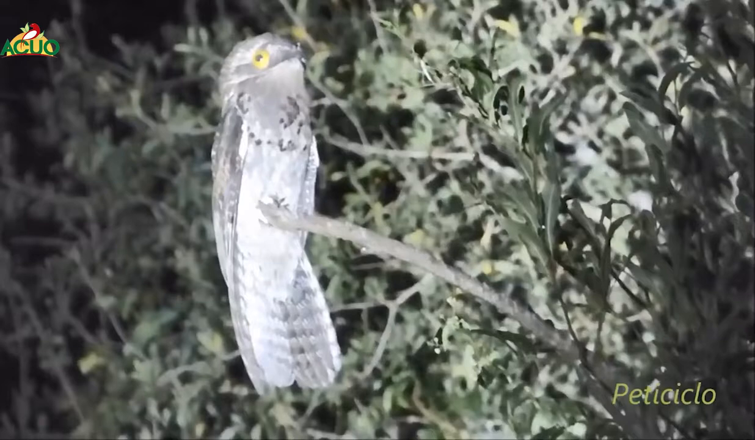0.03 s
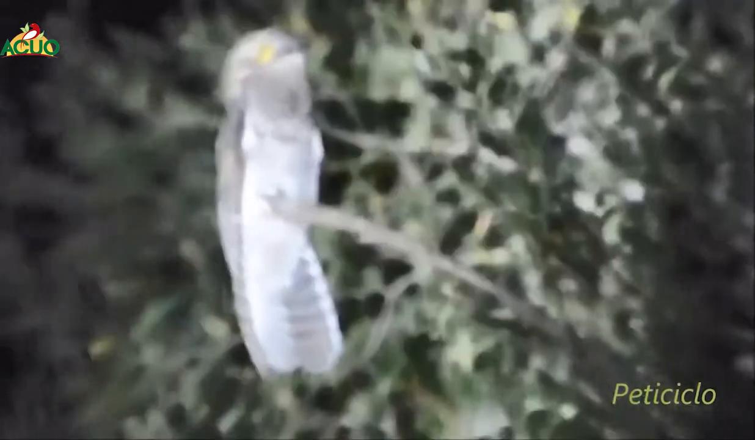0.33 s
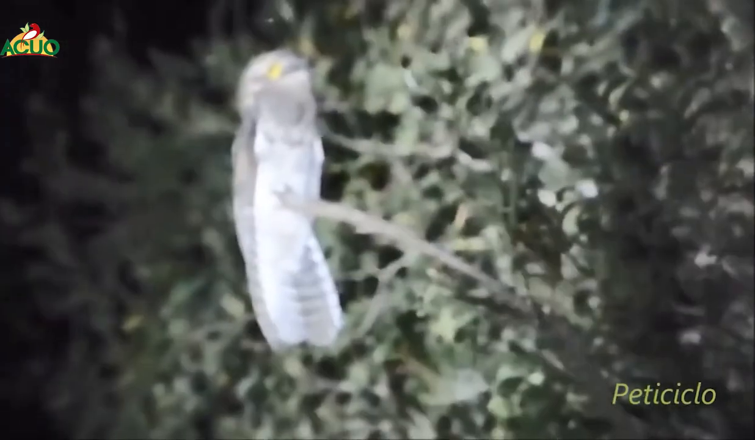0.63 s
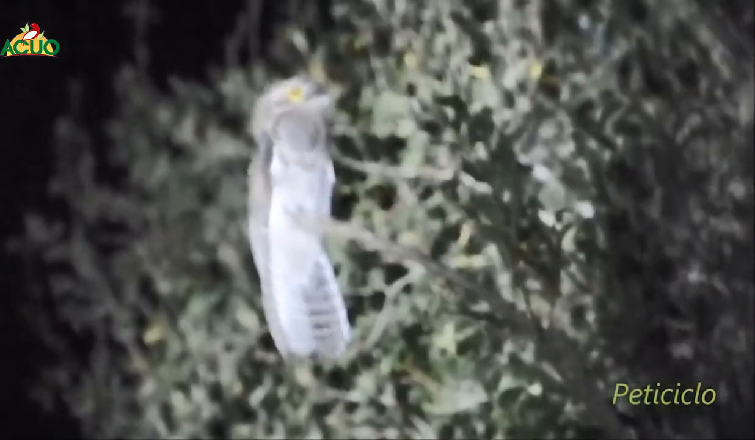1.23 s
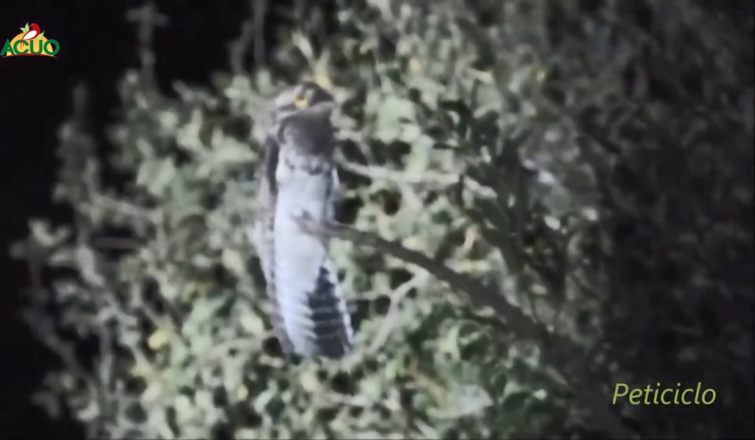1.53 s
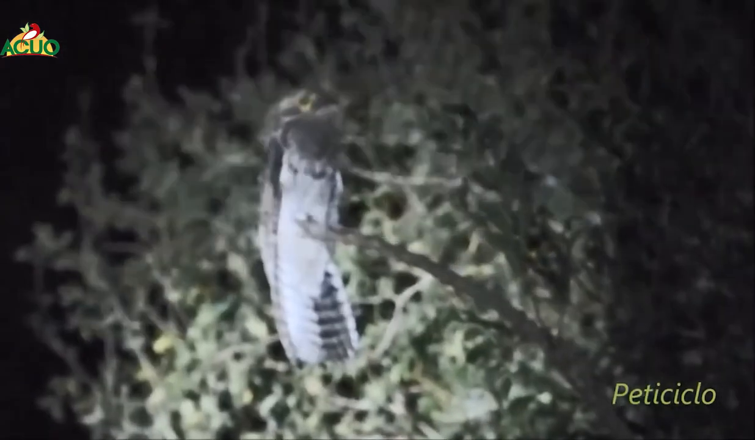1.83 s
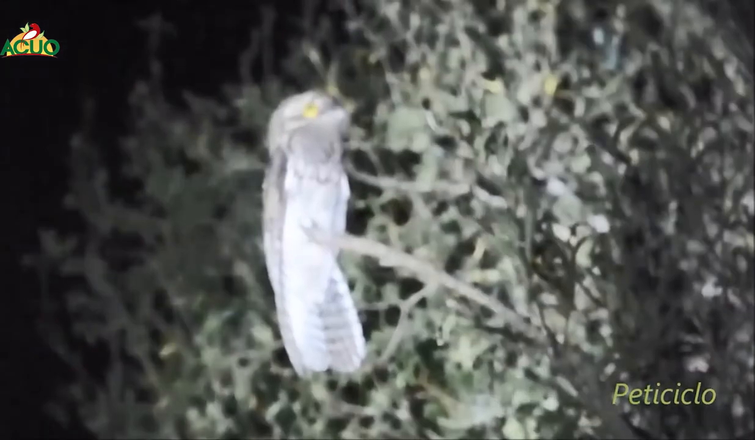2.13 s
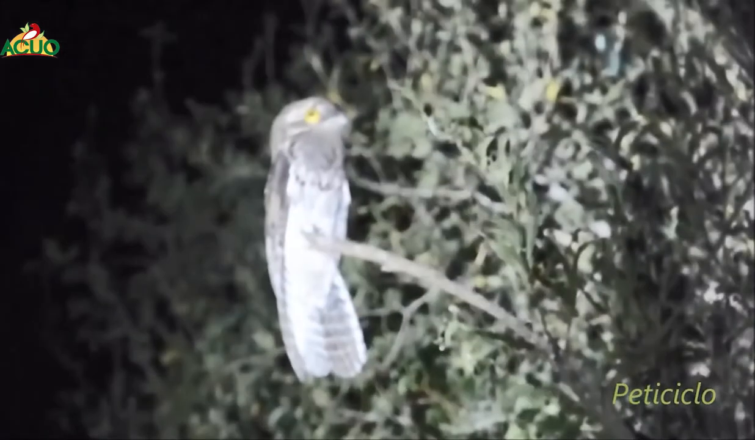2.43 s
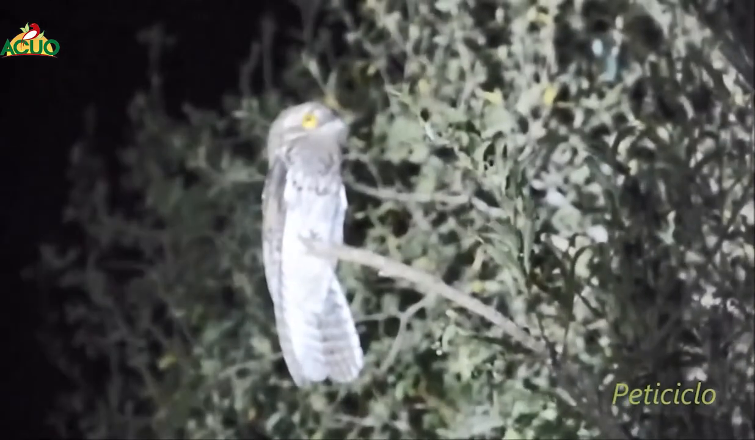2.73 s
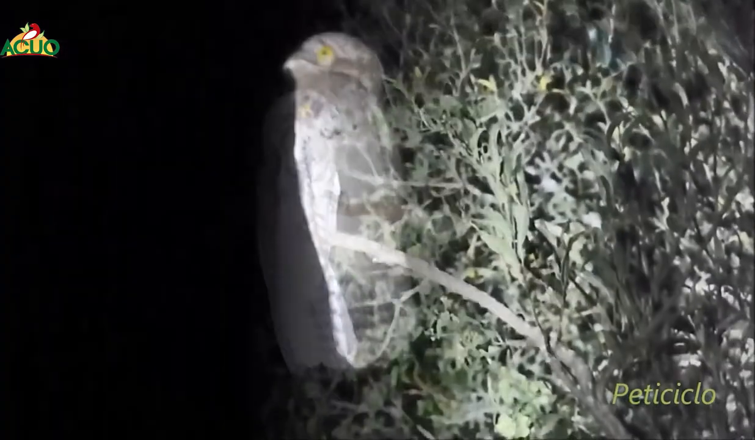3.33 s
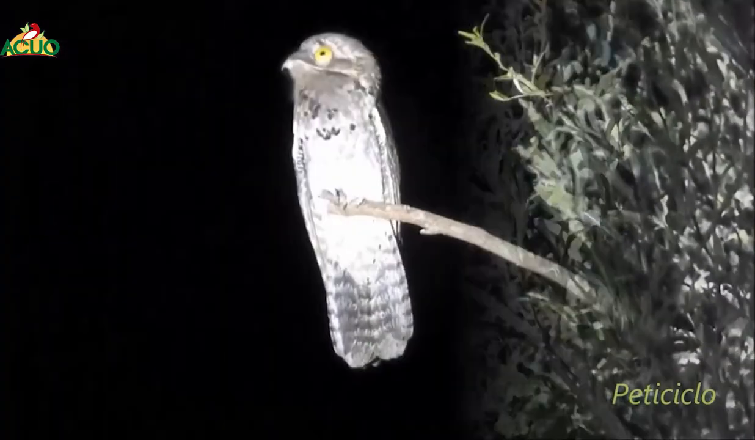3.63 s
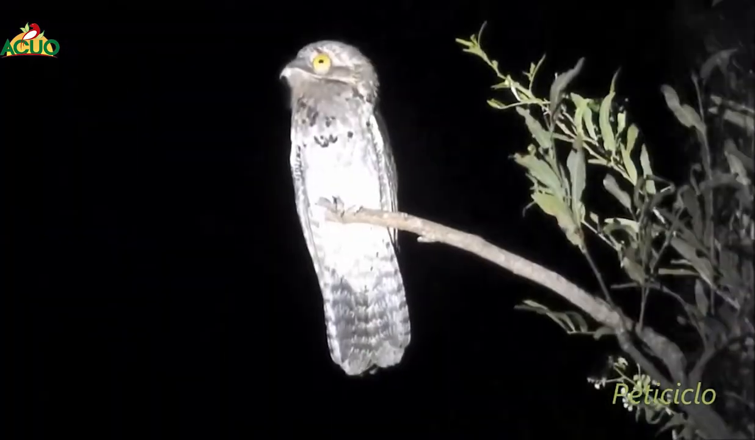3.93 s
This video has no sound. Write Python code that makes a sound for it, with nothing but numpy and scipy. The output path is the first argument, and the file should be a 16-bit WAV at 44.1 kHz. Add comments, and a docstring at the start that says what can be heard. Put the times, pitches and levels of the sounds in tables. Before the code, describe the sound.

A night bird, straight ahead among trees, gives four descending whistled wails with a faint echo. Before it starts, twigs tick over hiss and far crickets; a high katydid rasp joins during the second note.

```python
"""A potoo, a night bird, gives four wailing notes, each lower than the last and led in by a soft gulp.
Its voice is a nearly pure whistle with weak overtones, and the trees return a faint echo.
Crickets trill far off over a steady hiss, a very high insect buzz swells and fades, and a nearer
katydid starts rasping its wings. A few twigs tick early on; faint pips and hoots come from far away."""
import sys
import numpy as np
from scipy import signal
from scipy.fft import rfft, irfft
from scipy.io import wavfile

SR = 44100
rng = np.random.default_rng(int(sys.argv[2]) if len(sys.argv) > 2 else 0)


def unload_wav(signal):
    """Save mono or channel-first audio to the path in sys.argv[1] as 16-bit WAV at rate SR, clipped to [-1, 1]."""
    wavfile.write(
        sys.argv[1],
        SR,
        np.round(np.clip(np.atleast_2d(signal).T, -1, 1) * 32767).astype(np.int16),
    )


N = 176400
TIME = np.arange(N) / SR

# how alike the two ears hear the night: (frequency [Hz], likeness [0 to 1])
EAR_LIKENESS = [(40, 1), (130, 1), (300, 0.98), (650, 0.23), (1400, 0.79), (3000, 0.81), (5000, 0.64),
                (14000, 0.31)]
# steady hiss and rumble: (frequency [Hz], level [dB per Hz])
HISS_SPECTRUM = [(25, -66.5), (60, -67), (120, -72), (250, -75.5), (450, -77), (800, -78.5), (1300, -85),
                 (2000, -87.5), (2500, -90), (3600, -89.5), (5800, -88.5), (7000, -92.5), (9500, -95),
                 (12000, -86.5), (15500, -93)]
# far groups of crickets: (pitch [Hz], band width [Hz], level [dB], slow swing [dB])
CRICKET_BANDS = [(2917, 120, -59, 0), (4014, 130, -60.5, 0), (4590, 53, -61, 1.5), (4955, 77, -55, 2),
                 (5110, 520, -51.5, 1)]
# all those groups rise and fall together: (time [s], gain [dB])
CRICKET_GAIN = [(.1, 3.5), (.35, 0.5), (.52, -0.5), (.9, -2.5), (1.1, 2), (2.5, -0.5), (2.8, 5), (3.5, 4.5),
                (3.8, 0)]
# trills of a nearer tree cricket: (start [s], end [s], level [dB])
CRICKET_TRILLS = [(.07, .45, -52), (.63, .85, -54.5), (1.02, 1.21, -50.5), (1.27, 1.5, -51.5),
                  (1.55, 1.82, -51.5), (2.6, 2.89, -52.5), (3.0, 3.19, -46.5), (3.27, 3.5, -53)]
# swells of the very high insect: (start [s], end [s], gain [dB])
INSECT_SWELLS = [(.38, .71, 3.5), (.99, 1.39, 3.5), (1.73, 2.02, 5), (2.36, 2.75, 5.5)]
# that insect's tone colour: (frequency [Hz], level [dB per Hz])
INSECT_SPECTRUM = [(8000, -106), (10500, -99), (12000, -91.5), (13200, -89.5), (14100, -88), (14800, -87),
                   (15700, -100)]
# twig ticks: (time [s], level [dB], decay [s], low edge [Hz], high edge [Hz])
TWIG_TICKS = [(0.2574, -25, 0.001, 3000, 13000), (0.262, -32.5, 0.018, 8900, 11500),
              (0.3933, -29, 0.0032, 5770, 10400), (0.472, -26.5, 0.0025, 6100, 8700),
              (0.794, -40, .003, 6500, 9000)]
# dull rustles: (time [s], level [dB], decay [s])
DULL_RUSTLES = [(0.389, -41, 0.055), (.464, -34, 0.032), (.57, -48.5, 0.33), (.77, -44, 0.018)]
# distant pips, perhaps a frog: (middle time [s])
PIP_TIMES = [.28, .52, .73, .98, 2.78, 2.99, 3.11, 3.332, 3.55, 3.77, 3.97]
# far hoots: (middle time [s], length [s], first pitch [Hz], last pitch [Hz], level [dB])
FAR_HOOTS = [(0.579, 0.097, 476, 398, -49), (0.664, 0.2, 505, 537, -52), (1.133, 0.28, 349.6, 361, -55),
             (1.252, 0.16, 628, 617, -52.5)]
# the potoo's gulps: (middle time [s], length [s], first pitch [Hz], last pitch [Hz], level [dB])
THROAT_GULPS = [(1.618, 0.0051, 500, 720, -23.5), (1.622, 0.0089, 974, 1080, -25.5),
                (2.543, 0.019, 338, 530, -25), (2.563, 0.0076, 451, 580, -28),
                (2.573, 0.0086, 680, 760, -25.5), (2.586, 0.027, 758, 833, -27.5),
                (2.6, 0.022, 929, 935, -28), (3.063, 0.0097, 1290, 1030, -31),
                (3.185, 0.016, 290, 557, -25.5), (3.205, 0.012, 400, 515, -31),
                (3.244, 0.093, 640, 735, -40.5), (3.706, 0.007, 1130, 910, -30.5),
                (3.821, 0.02, 288.6, 540, -26.5), (3.843, 0.015, 397, 473, -32)]
# its four notes, one list of points for each: (time [s], pitch [Hz], level [dB])
WAIL_NOTES = [
    [(1.626, 843, -20), (1.65, 860, -22), (1.68, 907, -19), (1.72, 934, -20.5), (1.79, 942, -20),
     (1.87, 945.5, -18), (1.97, 941.8, -19.5), (2.07, 938, -25.5), (2.22, 931.3, -25), (2.385, 935, -23.5),
     (2.402, 910, -25)],
    [(2.606, 891, -25), (2.614, 857, -10.5), (2.63, 889, -15.5), (2.68, 911.6, -15), (2.73, 912, -18),
     (2.8, 900, -18.5), (2.86, 888, -23.5), (2.94, 884, -23), (3.0, 896.5, -25.5), (3.035, 891, -20),
     (3.05, 880, -24.5)],
    [(3.245, 777, -37), (3.27, 755, -17), (3.295, 788, -10.9), (3.35, 811, -10.5), (3.42, 828.4, -12),
     (3.48, 838.7, -16), (3.56, 819.5, -19), (3.605, 762.6, -23.0), (3.66, 766, -22), (3.695, 733, -28.5)],
    [(3.89, 655.5, -40.5), (3.915, 690.4, -18), (3.95, 710, -12.5), (4.0, 740.7, -13)],
]
# overtone levels: (time [s], at twice the pitch [dB], where the throat rings [dB], faint ones [dB])
OVERTONE_LEVELS = [(1.63, -62, -58, -64), (1.652, -47, -51, -62), (1.685, -47.5, -41, -63),
                   (1.73, -39.5, -39.5, -58), (1.78, -41.5, -36.5, -56), (1.802, -43, -30.5, -54.5),
                   (1.89, -40.5, -33.5, -59), (2.03, -42, -34.5, -58), (2.12, -37.5, -42.5, -58.5),
                   (2.39, -39.5, -54, -60), (2.6, -52, -59, -66), (2.71, -50.5, -57, -57.5),
                   (2.82, -46, -67, -63), (3.0, -45, -66, -61.5), (3.27, -66, -89, -78),
                   (3.48, -48, -79, -63), (3.68, -53.5, -75, -69), (3.95, -70, -74, -73)]
# the faint overtones one by one: (multiple of the pitch [times], gain [dB])
FAINT_OVERTONES = [(3, 3), (4, -5), (5, 2.5), (6, 2), (8, -0.5)]
# echoes from the trees: (delay [s], gain [dB])
TREE_ECHOES = [(.048, -34), (.095, -24)]
# the katydid's tone colour: (frequency [Hz], level [dB per Hz])
KATYDID_SPECTRUM = [(5500, -105), (6800, -88), (8000, -72.5), (8700, -70), (9200, -66), (10000, -67.5),
                    (11000, -74.5), (12000, -74), (12700, -68.5), (14000, -78.5), (15600, -89)]
# how its loudness moves: (time [s], gain [dB])
KATYDID_GAIN = [(2.75, 2), (2.93, -0.5), (3.15, -0.5), (3.5, -0.5), (4.0, -1)]
# the third note's quaver: (time [s], shakes [per s], pitch swing [share of pitch], level swing [dB])
VOICE_QUAVER = [(3.48, 220, 0, 0), (3.52, 210, .006, .15), (3.58, 130, .014, .35), (3.615, 70, .032, 1.8),
                (3.65, 90, .018, .9), (3.7, 125, .032, 1.2), (3.74, 125, 0, 0)]


def from_db(db):
    """Turns decibels into a number to multiply a sound by."""
    return 10 ** (np.asarray(db) / 20)


def rms_one(x):
    """Scales a signal so that its average strength (rms) is 1."""
    return x / np.sqrt(np.mean(x ** 2) + 1e-20)


def in_time(rows):
    """Joins a table's points with straight lines: one curve for each column after the time."""
    times, *columns = np.transpose(rows)
    return [np.interp(TIME, times, column) for column in columns]


def spectrum_curve(points):
    """Joins (frequency, value) points into a curve over all frequencies, on a log scale."""
    hz, value = np.transpose(points)
    return np.interp(np.log(np.fft.rfftfreq(N, 1 / SR) + 1), np.log(hz), value)


def ramp(x):
    """A smooth step from 0 to 1."""
    return np.sin(np.pi / 2 * np.clip(x, 0, 1)) ** 2


def drift(rate_hz):
    """A random wobble with a typical size of 1; a higher rate wobbles faster."""
    step = 40  # samples between random points
    memory = np.exp(-2 * np.pi * rate_hz * step / SR)
    white = rng.standard_normal(N // step + 2002)
    slow = signal.lfilter([1], [1, -2 * memory, memory ** 2], white)[2000:]  # let the filter settle
    return np.interp(np.arange(N) / step, np.arange(len(slow)), rms_one(slow))


def band(x, low_hz, high_hz, order=2):
    """Keeps the sound between two frequencies, at a strength of 1."""
    return rms_one(signal.sosfilt(signal.butter(order, [low_hz, high_hz], "band", fs=SR, output="sos"), x))


def stereo_noise(likeness=None):
    """White noise for two ears; a likeness of 1 gives both the same noise."""
    alike = spectrum_curve(EAR_LIKENESS) if likeness is None else likeness
    shared, opposite = rfft(rng.standard_normal((2, N)))
    return irfft(np.sqrt((1 + alike) / 2) * shared + np.sqrt((1 - alike) / 2) * opposite * [[1], [-1]], N)


def coloured(white, spectrum):
    """Gives white noise a tone colour, set in dB per Hz."""
    return irfft(rfft(white) * from_db(spectrum_curve(spectrum)), N) * np.sqrt(SR / 2)


def bouts(rows, edge_s):
    """A level that swells and fades once for each row."""
    return sum(from_db(db) * ramp((TIME - start) / edge_s) * ramp((end - TIME) / edge_s)
               for start, end, db in rows)


def burst(start, decay_s):
    """A level that jumps up and dies away."""
    return (TIME >= start) * np.exp(-np.maximum(TIME - start, 0) / decay_s)


def glide(middle_s, length_s, from_hz, to_hz, db):
    """One short, rounded tone that slides between two pitches."""
    progress = np.clip((TIME - middle_s) / length_s + .5, 0, 1)
    phase = 2 * np.pi * np.cumsum(from_hz + (to_hz - from_hz) * progress) / SR
    return np.sqrt(2) * from_db(db) * np.sin(np.pi * progress) * np.sin(phase)


def night_hiss():
    """A steady hiss with a low rumble under it."""
    return coloured(stereo_noise(), HISS_SPECTRUM)


def crickets():
    """Many far callers blur into narrow, fluttering bands of noise; one nearer cricket trills in bouts."""
    trill_hz, trill_width_hz = 2967, 95
    gain_db, = in_time(CRICKET_GAIN)
    chorus = np.zeros((2, N))
    for hz, width, db, swing_db in CRICKET_BANDS:
        callers = band(stereo_noise(), hz - width / 2, hz + width / 2, order=1)
        flutter_db = swing_db * drift(.99) + 2.8 * drift(49)
        chorus += from_db(db + gain_db) * rms_one(callers * from_db(flutter_db))
    trill = band(stereo_noise(), trill_hz - trill_width_hz / 2, trill_hz + trill_width_hz / 2)
    return chorus + bouts(CRICKET_TRILLS, edge_s=.08) * trill


def high_insect():
    """A thin, fluttering sizzle that swells out of a quiet simmer about every two thirds of a second."""
    simmer_db, flutter_db = -6, 2.5
    level = from_db(simmer_db) + bouts(INSECT_SWELLS, edge_s=.115)
    sizzle = coloured(stereo_noise(likeness=.87), INSECT_SPECTRUM)
    return level * from_db(flutter_db * drift(25)) * sizzle


def twigs():
    """Twigs give bright ticks and dull rustles, each a burst of noise that dies away."""
    body = from_db(-7.5) * band(stereo_noise(), 420, 8400, order=1)  # wide noise fills out each tick
    ticks = sum(from_db(db) * burst(start, decay) * (band(stereo_noise(), low, high) + body)
                for start, db, decay, low, high in TWIG_TICKS)
    rustle_level = sum(from_db(db) * burst(start, decay) * ramp((TIME - start) / .0037)
                       for start, db, decay in DULL_RUSTLES)
    rustles = rustle_level * band(stereo_noise(likeness=.37), 217, 500)
    return ticks + rustles * from_db([[-2], [2]])  # the rustles lie to the right


def far_calls():
    """Small pips and soft hoots from deep in the wood."""
    pips = sum(glide(time, length_s=.028, from_hz=1973, to_hz=1973, db=-52.5) for time in PIP_TIMES)
    hoots = sum(glide(*hoot) for hoot in FAR_HOOTS)
    return pips + hoots * from_db([[-3], [2]])  # the hoots lie to the right


def hum():
    """A faint low tone just before the first note."""
    return glide(middle_s=1.507, length_s=.24, from_hz=350, to_hz=350, db=-48.5)


def potoo_gulps():
    """The bird's throat catches around the notes, making quick sliding tones."""
    return sum(glide(*gulp) for gulp in THROAT_GULPS)


def potoo_wails():
    """A whistle whose weak overtones grow louder as they pass the pitch at which the throat rings."""
    attack_s, release_s, end_drop_hz_per_s = .005, .016, 25300
    throat_hz, throat_width_hz = 4020, 730
    second_db, throat_db, faint_db = in_time(OVERTONE_LEVELS)
    second = from_db(second_db + .9 * drift(22))
    faint = [(multiple, from_db(faint_db + db + 3 * drift(40))) for multiple, db in FAINT_OVERTONES]
    dropout = 1 - np.exp(-((TIME - 2.073) / .008) ** 2)  # the bright overtone dips for an instant
    throat = from_db(throat_db + 1.8 * drift(22)) * dropout
    shake, shake_db = potoo_quaver()
    waver = 1 + .0015 * drift(50) + shake
    shimmer_db = .25 * drift(25) + shake_db
    voice = np.zeros(N)
    for note in WAIL_NOTES:
        hz, db = in_time(note)
        start, end = note[0][0], note[-1][0]
        if note is WAIL_NOTES[-1]:
            end += 1  # the last note is held on
        on = (TIME > start - attack_s) & (TIME < end + release_s)
        t = TIME[on]
        pitch = (hz * waver)[on] - end_drop_hz_per_s * np.maximum(t - end, 0)  # falls as the bird lets go
        phase = 2 * np.pi * np.cumsum(pitch) / SR
        tone = from_db(db + shimmer_db)[on] * np.sin(phase) + second[on] * np.sin(2 * phase)
        for multiple, level in faint:
            ringing = ramp(1 + (throat_width_hz / 2 - abs(multiple * pitch - throat_hz)) / 120)
            tone += (level[on] + ringing * throat[on]) * np.sin(multiple * phase)
        fade = ramp(1 + (t - start) / attack_s) * ramp(1 - (t - end) / release_s)
        voice[on] += np.sqrt(2) * tone * fade
    return voice


def tree_echoes(sound):
    """The trees send back two echoes and a thin wash of sound that dies away."""
    tail_s, tail_db = .38, -25  # the wash falls by 60 dB in tail_s
    echoes = sum(from_db(db) * np.interp(TIME - delay, TIME, sound, left=0) for delay, db in TREE_ECHOES)
    tail = stereo_noise(likeness=1)[:, :SR] * from_db(-60 * TIME[:SR] / tail_s)
    tail /= np.sqrt(np.sum(tail ** 2) / 2)
    return echoes + from_db(tail_db) * signal.fftconvolve(sound[None], tail, axes=1)[:, :N]


def katydid():
    """Each wing stroke is a sharp rasp over a weaker scrape; nearby leaves reflect it."""
    start_s, rise_s, strokes_per_s, stroke_db = 2.728, .019, 133.7, 11
    leaf_delay_s, leaf_db = .0028, -16
    repeat_share = .23  # this much of the scrape is the same in every stroke
    cycle = (strokes_per_s * TIME + .0016 * drift(1.1)) % 1
    stroke = np.exp(-.5 * ((cycle - .5) / .041) ** 2)  # a narrow peak halfway through each cycle
    teeth = rng.standard_normal(SR)[(cycle * SR / strokes_per_s).astype(int)]
    scrape = np.sqrt(repeat_share) * teeth + np.sqrt(1 - repeat_share) * stereo_noise(likeness=.66)
    rasp = scrape * from_db(stroke * (stroke_db + .5 * drift(60)))
    leaf_echo = from_db(leaf_db) * np.roll(rasp, int(leaf_delay_s * SR), axis=1)
    song = coloured(rms_one(rasp + leaf_echo), KATYDID_SPECTRUM)
    gain_db, = in_time(KATYDID_GAIN)
    level = ramp((TIME - start_s) / rise_s) * from_db(gain_db + 1.56 * drift(25))
    return song * level * from_db([[.66], [-.66]])  # a little to the left


def potoo_quaver():
    """The fading third note shakes unevenly; gives (pitch change [share], level change [dB])."""
    unevenness = .4
    shakes_per_s, pitch_swing, swing_db = in_time(VOICE_QUAVER)
    phase = 2 * np.pi * np.cumsum(shakes_per_s * (1 + unevenness / 2 * drift(57.4))) / SR
    shake = (1 + unevenness * drift(40)) * np.sin(phase)
    return pitch_swing * shake, swing_db * shake


def scene():
    """The bird almost straight ahead, the night all around."""
    right_ear_lag_s = .000006
    night = night_hiss() + crickets() + high_insect() + twigs() + far_calls() + hum()
    bird = potoo_gulps() + potoo_wails()
    direct = np.array([bird, np.interp(TIME - right_ear_lag_s, TIME, bird)])
    return night + direct + tree_echoes(bird) + katydid()


def record(dry):
    """The sound opens after a moment of silence, and the very highest treble is cut away."""
    silence_s, cutoff_hz = .11, 15800
    low_pass = signal.ellip(12, .1, 90, cutoff_hz, fs=SR, output="sos")
    return signal.sosfilt(low_pass, dry * (TIME > silence_s) + 1e-18)


dry = scene()
out = record(dry)
unload_wav(out)
```